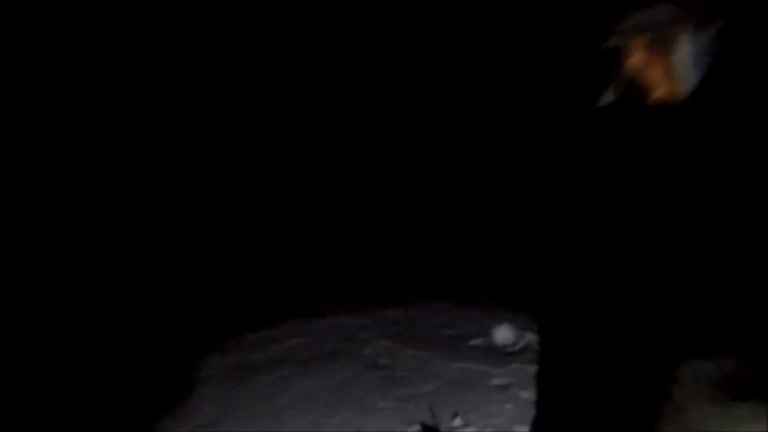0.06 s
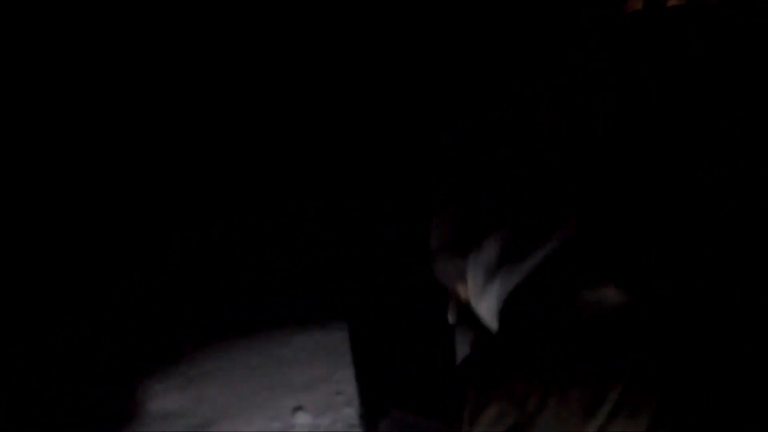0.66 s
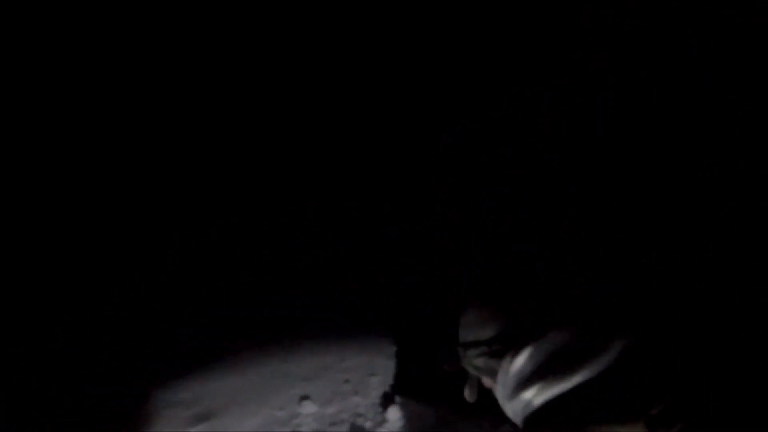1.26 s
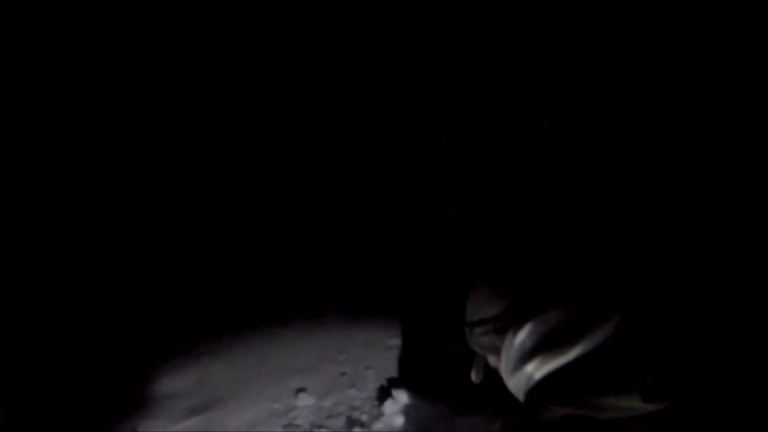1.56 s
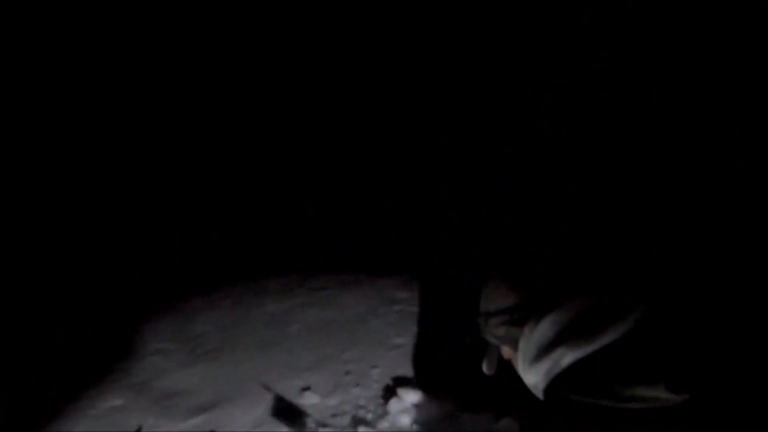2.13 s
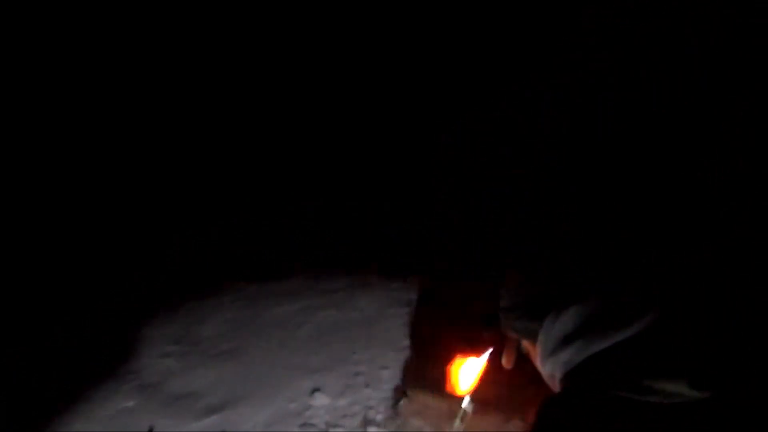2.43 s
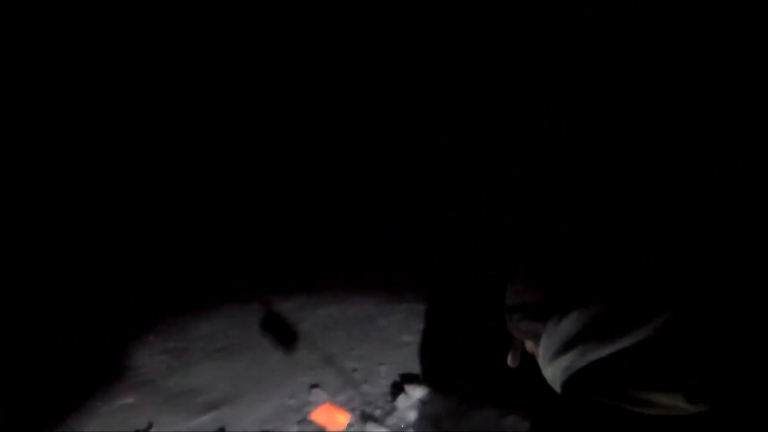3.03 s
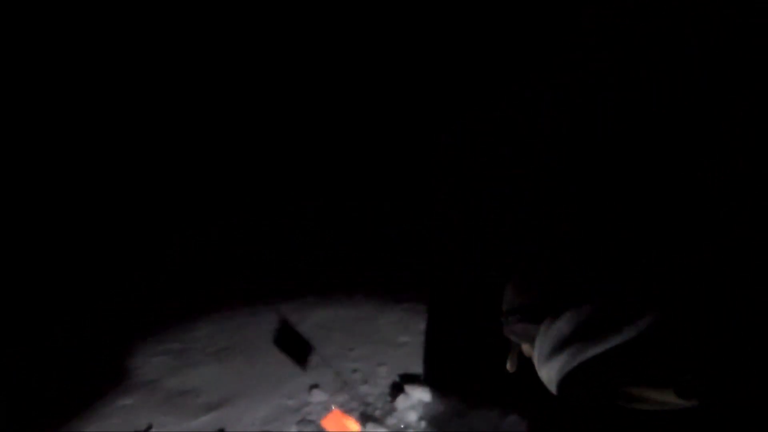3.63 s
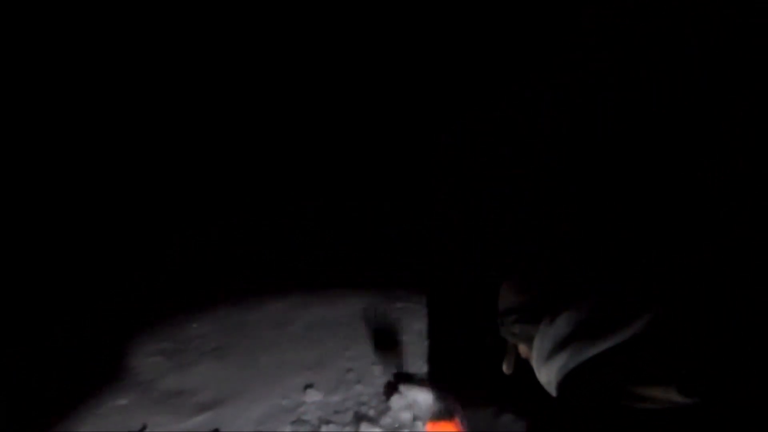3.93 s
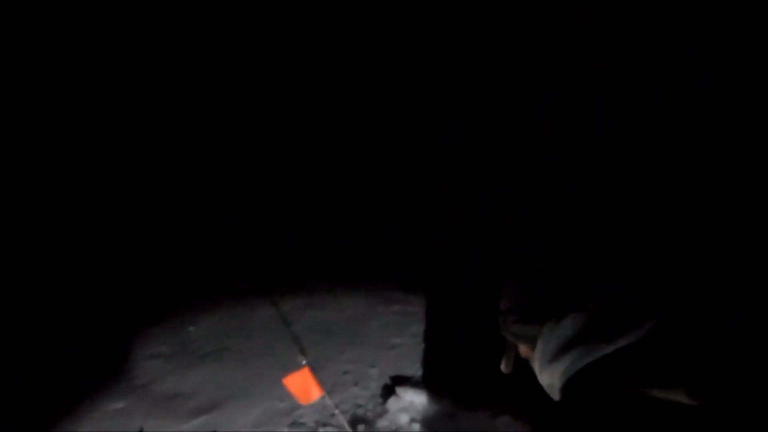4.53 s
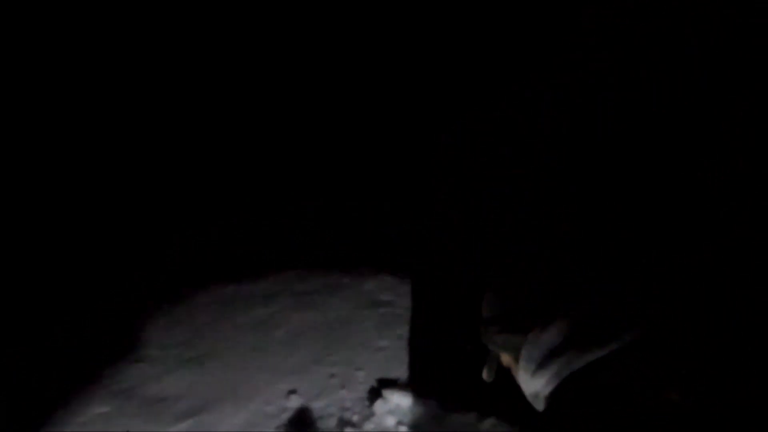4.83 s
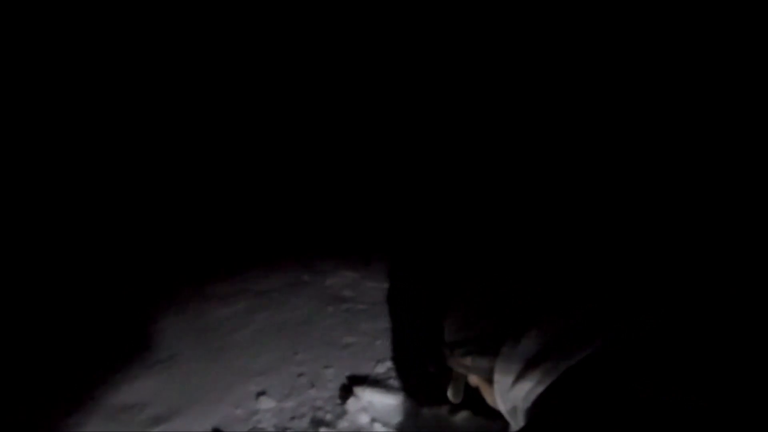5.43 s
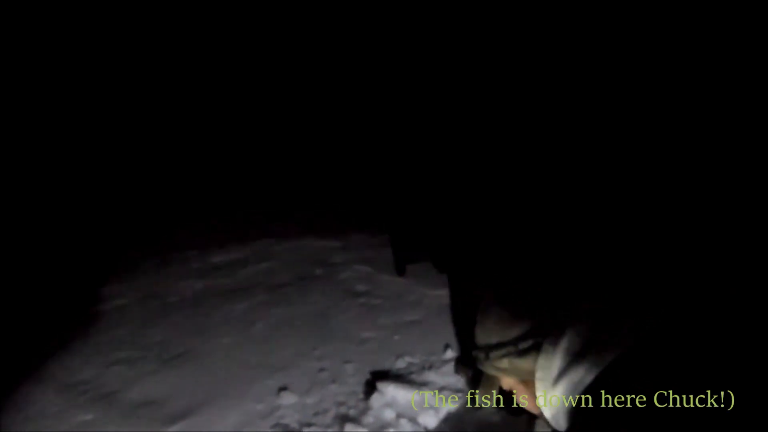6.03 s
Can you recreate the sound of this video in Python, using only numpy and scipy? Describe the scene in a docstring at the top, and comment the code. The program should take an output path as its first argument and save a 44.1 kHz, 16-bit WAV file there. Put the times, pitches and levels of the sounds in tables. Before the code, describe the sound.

Close up in quiet open air, someone shifts on packed snow, clothing rubbing and thin ice cracking. Hands then work in a slushy fishing hole: quick clusters of wet slaps, bubbly plops, clunks of ice and water running back. The trickle thins to drips, followed by a short hard click and some dull knocks on snow. A faint rumble and hiss lie underneath.

```python
"""Ice fishing on a still night.

Over a faint rumble and hiss, someone kneels in crusted snow; stiff winter clothes rustle.
Hands break the skin of ice on the hole, stir the slush and lift a rig out. Each slap traps a bubble
and throws water that runs back; after the lift the trickle thins to single drops."""
import sys
import numpy as np
from scipy import signal
from scipy.fft import rfft, irfft
from scipy.io import wavfile

SR = 44100
rng = np.random.default_rng(int(sys.argv[2]) if len(sys.argv) > 2 else 0)


def file_out(sig):
    """Save sig as 16-bit WAV at sys.argv[1]."""
    # one column per channel
    cols = np.atleast_2d(sig).T
    # limit, then scale
    lim = np.clip(cols, -1, 1)
    pcm = np.round(lim * 32767).astype(np.int16)
    wavfile.write(sys.argv[1], SR, pcm)


N = 277036
TIME_S = np.arange(N) / SR
BURST_FFT, LAYER_FFT = 8192, 294912
LIFT_S, DRAIN_DECAY_S, DRIP_END_S = 4.0, 0.31, 5.1
TRAP_DELAY_S = 0.002018  # from a slap to its bubble closing

# Spectra. Each row: frequency in Hz, relative level in dB.
AIR_SPECTRUM = [(25, -6.5), (50, -11.5), (140, -19.5), (320, -14), (550, -25), (2500, -32), (14000, -40.5)]
PRESSING_SPECTRUM = [(40, -19), (160, -8), (265, -2), (400, -3), (620, 2), (1500, -38.5)]
SLIDING_SPECTRUM = [(300, -23.5), (800, -3.5), (3000, -7), (7000, -11.5), (14000, -19)]
CRUST_SPECTRUM = [(40, -9), (150, -5.5), (580, 3), (1200, -6.5), (1900, -3.5), (9000, -21), (14000, -32.5)]
SLUSH_SPECTRUM = [(60, -30), (550, -8), (1200, -9.5), (1900, -4), (3400, -10), (4500, -10), (8000, -14.5),
                  (14000, -26)]
# Stereo widths. Each row: frequency in Hz, side minus mid in dB.
AIR_WIDTH = [(100, -5.5), (300, -8.5), (6000, 0.5)]
BODY_WIDTH = [(100, -11.5), (1400, -22.5), (5000, -7.5), (9000, -3)]
WATER_WIDTH = [(150, -7), (1400, -23), (3200, -17.5), (8000, -5)]
# Resonances of the rig and of the air in the hole. Each row: centre in Hz, width in Hz, boost in dB.
RIG_MODES = [(1420, 870, 15.3), (2720, 490, 26.5), (4110, 940, 21.5), (7000, 2800, 9.7)]
HOLE_MODES = [(580.4, 245, 10), (1007, 210, 7), (1620, 260, 4.5), (2000, 190, 5.5), (2555, 230, 5.5),
              (3500, 320, 9.5)]
# Background dips. Each row: start in seconds, gain in dB, recovery in seconds.
AIR_DIPS = [(2.47, -5.5, 0.35), (3.44, -7, 0.51)]
# Body moves. Each row: start and length in seconds, relative pressing and sliding levels in dB.
MOVES = [(-0.02, 0.26, -38.5, -42), (0.279, 0.075, -45, -51.5), (0.366, 0.17, -51, -56),
         (0.548, 0.17, -48.5, -52), (0.807, 0.29, -46, -55), (1.111, 0.19, -45.5, -49.5),
         (1.295, 0.038, -50, -53.5), (1.558, 0.092, -50.5, -59), (1.676, 0.02, -54, -49.5),
         (1.925, 0.031, -41, -44.5), (5.491, 0.032, -47.5, -54), (5.543, 0.12, -49, -55)]
# Crust caving in. Each row: start and length in seconds, relative level in dB, tilt in dB per octave,
# bass gain in dB.
CRUNCHES = [(0.228, 0.023, -45, 0.5, 15), (0.582, 0.054, -48.5, 1.6, 15), (1.513, 0.0082, -44.5, 4, -15),
            (1.534, 0.015, -53.5, 6, 16), (1.563, 0.066, -46.5, 6.5, 8), (1.636, 0.009, -43, 5, 29),
            (1.864, 0.0047, -38.5, 1, -4.5), (1.872, 0.01, -46, 2.5, 16), (6.229, 0.019, -41.5, -2, 7)]
# Thin ice snapping. Each row: start in seconds, relative level in dB, tilt in dB per octave.
ICE_SNAPS = [(0.415, -41.5, 2), (0.462, -51.5, -0.5), (0.494, -45, 1.5), (0.717, -50, 1.5),
             (0.738, -51, 2.5), (0.836, -53, -0.5), (0.853, -50.5, 1.5), (1.098, -52, 3.5), (1.165, -46, 2),
             (1.293, -45, -0.5), (1.346, -50, -1), (1.378, -54, 1.5), (2.674, -54.5, 1.5),
             (2.705, -49.5, 0.5), (4.285, -55.5, 1.5), (4.367, -52.5, 1.5), (5.003, -60.5, -1),
             (5.883, -49.5, -4.5)]
# Knocks on packed snow. Each row: start in seconds, relative level in dB.
SNOW_KNOCKS = [(0.745, -49.5), (1.96, -45.5), (5.22, -53), (5.668, -46), (6.163, -53.5)]
# Loose ice bumping. Each row: start in seconds, level in dB, pitch in Hz.
ICE_CLUNKS = [(1.657, -41.5, 715), (1.741, -37.5, 1080), (1.92, -36.5, 600), (2.0803, -38, 2020),
              (2.512, -33, 1990), (3.808, -40, 2050), (4.232, -42, 910)]
# A hand stirring the water. Each row: start and length in seconds, relative level in dB.
STIRS = [(2.027, 0.016, -50), (2.11, 0.065, -53.5), (2.66, 0.11, -51.5), (2.85, 0.25, -48.5),
         (3.199, 0.2, -49.5), (3.56, 0.012, -47.5), (3.731, 0.044, -45), (3.908, 0.1, -59.5),
         (4.117, 0.024, -46.5)]
# Further bubbles, each opening with a soft splat: drops falling into the hole, and extra bubbles right after
# some slaps. Each row: start in seconds, bubble peak in dB, bubble pitch in Hz.
BUBBLES = [(2.543, -39, 1484), (2.584, -50, 559), (2.759, -41.5, 6850), (2.915, -38, 1570), (2.989, -29, 830),
           (3.013, -41.5, 560), (3.157, -31.5, 2380), (3.317, -35, 4060), (3.385, -40.5, 852),
           (3.431, -24.5, 3190), (3.579, -41.5, 612), (3.965, -50, 851), (4.005, -29.5, 1806),
           (4.252, -51, 2100), (4.448, -44, 5670), (4.492, -48.5, 2240), (4.52, -50.5, 3200),
           (4.589, -54, 2650), (4.745, -63, 970), (5.187, -52, 1350)]
# Slaps in the slush. Each row: start in seconds, relative level in dB, tilt in dB per octave,
# bubble peak in dB, bubble pitch in Hz.
SLAPS = [(2.44, -43, 0.5, -51, 1570), (2.452, -37, -2.5, -38, 535), (2.464, -35, 2.5, -39, 2350),
         (2.47, -28.5, -6, -27.5, 967), (2.829, -38, -2, -41, 1820), (2.858, -38, 3.5, -35, 3500),
         (2.868, -32.5, 0, -32, 1560), (2.8985, -38, -4, -36, 893), (2.974, -34, -1.5, -39, 596),
         (3.061, -42, -0.5, -40, 1730), (3.091, -31.5, -2.5, -32.5, 285), (3.104, -36.5, -0.5, -33, 494),
         (3.123, -35.5, -2, -35.5, 3600), (3.148, -36, -3.5, -38, 559), (3.4304, -29, -2.5, -27, 562),
         (3.439, -31, -1.5, -29, 1950), (3.693, -38, -6, -44, 557), (3.725, -42.5, 0, -42, 608),
         (3.767, -36, -3.5, -41, 1000), (4.004, -32, -3.5, -29.5, 541)]


def from_db(db):
    return 10 ** (np.asarray(db) / 20)


def unit_rms(x):
    return x / np.sqrt(np.mean(x ** 2) + 1e-20)


def bins_hz(size):
    return np.maximum(np.fft.rfftfreq(size, 1 / SR), 1)


def curve_db(points, hz):
    """Interpolate on a log-frequency axis."""
    knots_hz, knots_db = np.array(points).T
    return np.interp(np.log(hz), np.log(knots_hz), knots_db)


def resonances_db(modes, size=BURST_FFT):
    """One bell-shaped boost per mode."""
    hz = bins_hz(size)
    return sum(db / (1 + (2 * (hz - centre_hz) / width_hz) ** 2) for centre_hz, width_hz, db in modes)


def slush_db(size=BURST_FFT):
    """Wet spectrum, lifted where the air in the hole resonates."""
    return curve_db(SLUSH_SPECTRUM, bins_hz(size)) + resonances_db(HOLE_MODES, size)


def add(out, start_s, sound):
    start = int(np.clip(start_s * SR, 0, N - 1))
    out[..., start:start + sound.shape[-1]] += sound[..., :N - start]


def drift(rate_hz):
    """Random wander between Gaussian knots."""
    knots = rng.standard_normal(2048)
    return np.interp(TIME_S * rate_hz % 2047, np.arange(len(knots)), knots)


def decay(start_s, decay_s):
    return (TIME_S > start_s) * np.exp(-np.clip((TIME_S - start_s) / decay_s, 0, 20))


def stroke(start_s, length_s, attack_s, swell_db, release_s):
    """Envelope of a movement: sets in, swells to 1, dies away."""
    t = TIME_S - start_s
    attack = np.clip(t / attack_s, 0, 1)
    swell = from_db(swell_db * (np.clip(t / length_s, 0, 1) - 1))
    return attack * swell * np.exp(-np.clip((t - length_s) / release_s, 0, 20))


def colour(mid_side, gains_db, width):
    """Minimum-phase filter: mid and side in, left and right out at rms 1."""
    size = 2 * (len(gains_db) - 1)
    cepstrum = irfft(np.log(from_db(gains_db)))
    cepstrum[1:size // 2] *= 2
    cepstrum[size // 2 + 1:] = 0
    mid, side = rfft(mid_side, size) * np.exp(rfft(cepstrum))
    side = side * from_db(curve_db(width, bins_hz(size)))
    return unit_rms(irfft([mid + side, mid - side])[:, :mid_side.shape[1]])


def colour_layer(mid_side, spectrum, width):
    return colour(mid_side, curve_db(spectrum, bins_hz(LAYER_FFT)), width)


def grains(samples, per_s, spread_db, hiss):
    """Tiny uneven breaks over smooth hiss, as mid and side."""
    sizes = from_db(spread_db * np.minimum(rng.exponential(1, samples), 4))
    breaks = sizes * (rng.random(samples) < per_s / SR) * rng.choice([-1, 1], (2, samples))
    return unit_rms(breaks) + hiss * rng.standard_normal((2, samples))


def bursts(rows, spectrum_db, width, snap, per_s, ripple_db, rise_s=0.001):
    """Each blow is a snap within a short shower of breaks. Rows as in CRUNCHES."""
    out = np.zeros((2, N))
    t, hz = np.arange(BURST_FFT) / SR, bins_hz(BURST_FFT)
    octaves = np.log2(np.maximum(hz, 200) / 1000)
    bass_shelf = 1 / (1 + (hz / 420) ** 4)
    for start_s, length_s, level_db, tilt_db, bass_db in rows:
        shower = (1 - np.exp(-t / rise_s)) * np.exp(-(t / length_s) ** 1.65)
        force = grains(BURST_FFT, per_s, spread_db=3, hiss=0.64) * shower
        force[:, int(rise_s * SR)] += snap * np.linalg.norm(force[0]) * rng.choice([-1, 1], 2)
        # each lump and air pocket has its own resonances
        ripple = np.interp(np.sqrt(hz) / 2.846, np.arange(BURST_FFT), rng.standard_normal(BURST_FFT))
        gains_db = spectrum_db + tilt_db * octaves + bass_db * bass_shelf + ripple_db * ripple
        gain = from_db(level_db) * np.sqrt(length_s * SR / BURST_FFT)
        add(out, start_s, gain * colour(force, gains_db, width))
    return out


def bubble(hz, t60_s, rise, swell_cycles=1.74):
    """Damped sine; the pitch climbs as the bubble nears the surface."""
    t = np.arange(int(t60_s * SR) + 2) / SR
    envelope = (1 - np.exp(-hz * t / swell_cycles)) * from_db(-60 * t / t60_s)
    return envelope / envelope.max() * np.sin(2 * np.pi * hz * t * (1 + rise * t / t60_s))


def swarm(count, low_hz, octaves, cycles, treble_db):
    """Bubbles of random time, pitch, level and place; rms 1."""
    out = np.zeros((2, N))
    for when, pitch, faintness, life, place in rng.random((count, 5)):
        hz = low_hz * 2 ** (octaves * pitch ** 1.2)
        pan_db = from_db(curve_db(WATER_WIDTH, hz)) * 20 * (place - 0.5)
        gains = from_db([[pan_db], [-pan_db]]) * from_db(treble_db * pitch - 20 * faintness)
        add(out, when * N / SR, gains * bubble(hz, cycles * (0.5 + life) / hz, rise=0.096))
    return unit_rms(out)


def background(rumble_hz=30.2):
    """Far rumble and faint hiss; the level dips briefly after the two hardest slaps."""
    air = from_db(-59.5) * colour_layer(rng.standard_normal((2, N)), AIR_SPECTRUM, AIR_WIDTH)
    rumble = from_db(-60.5) * np.sin(2 * np.pi * rumble_hz * TIME_S + 0.8 * drift(3))
    dip_db = sum(db * (TIME_S > start_s) * np.exp(-((TIME_S - start_s) / recovery_s) ** 4)
                 for start_s, db, recovery_s in AIR_DIPS)
    return from_db(dip_db) * (air + rumble)


def knee(peak_s=1.054, swell_s=0.077, hz=265):
    """Snow packs under a knee: a narrow low rub."""
    band = signal.butter(2, [hz / 1.2, hz * 1.2], "band", fs=SR, output="sos")
    rub = unit_rms(signal.sosfilt(band, rng.standard_normal(N)))
    return from_db(-51.5) * np.exp(-((TIME_S - peak_s) / swell_s) ** 2) * rub


def effort_db(settled_s=2, attack_s=0.013, swell_db=6, release_s=0.012):
    """Pressing and sliding grow as weight comes on; clothes stir faintly until the body settles."""
    pressing = sliding = from_db(-70.5) * stroke(0, settled_s, attack_s, 0, release_s) + 1e-9
    for start_s, length_s, pressing_db, sliding_db in MOVES:
        envelope = stroke(start_s, length_s, attack_s, swell_db, release_s)
        pressing = pressing + from_db(pressing_db) * envelope
        sliding = sliding + from_db(sliding_db) * envelope
    return 20 * np.log10([pressing, sliding])


def rustle():
    """Weight packs snow with a dull creak; sliding cloth hisses and snaps single crystals."""
    pressing_db, sliding_db = effort_db()
    catching_db = 1.8 * drift(90)
    creak = colour_layer(grains(N, per_s=700, spread_db=2.5, hiss=0.53), PRESSING_SPECTRUM, BODY_WIDTH)
    grit = grains(N, per_s=2000, spread_db=0.5, hiss=0.94)
    crystals = grains(N, per_s=45, spread_db=3.5, hiss=0)
    rub = colour_layer(grit + from_db(-6.5) * crystals, SLIDING_SPECTRUM, BODY_WIDTH)
    # slow rubbing is duller
    dull_rub = signal.sosfilt(signal.butter(1, 4500, fs=SR, output="sos"), rub)
    speed = 1 / (1 + from_db(-2 * (sliding_db + 53)))
    sliding = dull_rub + 0.75 * speed * (rub - dull_rub)
    # gentle pressing keeps only the lows
    low_creak = signal.sosfilt(signal.butter(2, 420, fs=SR, output="sos"), creak)
    weight = 1 / (1 + from_db(-2 * (pressing_db + 42)))
    pressing = np.sqrt(1 - weight) * low_creak + np.sqrt(weight) * creak
    return from_db(catching_db) * (from_db(pressing_db - 5) * pressing + from_db(sliding_db) * sliding)


def crust(snap_s=0.0033, knock_s=0.0059):
    """Snow crust caves in, thin ice snaps, packed snow knocks dully."""
    snaps = [(start_s, snap_s, db, tilt_db, -20.5 + 12.4 * tilt_db) for start_s, db, tilt_db in ICE_SNAPS]
    knocks = [(start_s, knock_s, db, -5.5, -1) for start_s, db in SNOW_KNOCKS]
    rows = CRUNCHES + snaps + knocks
    spectrum_db = curve_db(CRUST_SPECTRUM, bins_hz(BURST_FFT))
    return from_db(3.5) * bursts(rows, spectrum_db, BODY_WIDTH, snap=0.26, per_s=2800, ripple_db=2)


def rig_click(start_s=4.852, contact_s=0.0086, level_db=-41.5):
    """A hard part of the rig catches and rings briefly."""
    row = (start_s, contact_s, level_db, 0, 0)
    return bursts([row], resonances_db(RIG_MODES), WATER_WIDTH, snap=0.1, per_s=2600, ripple_db=-1.5)


def ice_clunks(contact_s=0.0034, tilt_db=-2.5, bass_db=-5, q=2, ring_db=10.5):
    """Loose ice bumps in the hole; each lump rings hollow at its own pitch."""
    out = np.zeros((2, N))
    for start_s, db, hz in ICE_CLUNKS:
        row = (start_s, contact_s, db, tilt_db, bass_db)
        spectrum_db = slush_db() + resonances_db([(hz, hz / q, ring_db)])
        out += bursts([row], spectrum_db, WATER_WIDTH, snap=0.35, per_s=2500, ripple_db=1.5)
    return out


def water_flow():
    """Envelope of water stirred by hand, running back after slaps and draining off the rig."""
    stirred = [from_db(db) * stroke(start_s, length_s, attack_s=0.0074, swell_db=2.5, release_s=0.034)
               for start_s, length_s, db in STIRS]
    runoff = [from_db(db - 16.5) * decay(start_s, decay_s=0.065) for start_s, db, *_ in SLAPS]
    drain = [from_db(-50.5) * decay(LIFT_S, DRAIN_DECAY_S)]
    return np.sqrt(sum(part ** 2 for part in stirred + runoff + drain))


def trickle():
    """Water gurgles, sprays and patters in spurts; draining sounds the air in the hole.
    Faint stray drips tick throughout the stirring and draining."""
    flow = water_flow() * from_db(-3 + 4.8 * drift(90))
    gurgle = from_db(-2) * swarm(2400, low_hz=481.3, octaves=2.6, cycles=22, treble_db=4)
    spray = from_db(-11) * swarm(2400, low_hz=2000, octaves=2.5, cycles=16, treble_db=2.5)
    hollow = from_db(-57) * swarm(900, low_hz=900, octaves=0.17, cycles=41, treble_db=2)
    wet_grains = grains(N, per_s=900, spread_db=2.8, hiss=0.5)
    patter = from_db(-5) * colour(wet_grains, slush_db(LAYER_FFT), WATER_WIDTH)
    drips = from_db(-76) * swarm(520, low_hz=1280, octaves=2.03, cycles=8.6, treble_db=3.5)
    dripping = (TIME_S > STIRS[0][0]) & (TIME_S < DRIP_END_S)
    return flow * (gurgle + spray + patter) + decay(LIFT_S, DRAIN_DECAY_S) * hollow + dripping * drips


def hole_ring(lowest_t60_s=0.06, slosh_octaves=0.08):
    """Each slap rings the air in the hole; sloshing detunes it."""
    out = np.zeros(N)
    for start_s, db, *_ in SLAPS:
        for mode_hz, _, boost_db in HOLE_MODES:
            t60_s = lowest_t60_s * np.sqrt(HOLE_MODES[0][0] / mode_hz)
            for hz in mode_hz * 2 ** (slosh_octaves * rng.standard_normal(2)):
                add(out, start_s + TRAP_DELAY_S, from_db(db + boost_db - 28) * bubble(hz, t60_s, rise=0))
    return out


def plops(ref_t60_s=0.038, ref_hz=1000, ref_db=-39.5):
    """Bubbles trapped by slaps and drops; low ones and quiet, deeper ones ring longest."""
    out = np.zeros(N)
    trapped = [(start_s + TRAP_DELAY_S, db, hz) for start_s, _, _, db, hz in SLAPS]
    for start_s, peak_db, hz in trapped + BUBBLES:
        t60_s = ref_t60_s * np.sqrt(ref_hz / hz) * from_db(0.21 * (ref_db - peak_db))
        add(out, start_s, from_db(peak_db) * bubble(hz, t60_s, rise=0.1))
    return out


def slush(impact_s=0.0064):
    """Hands slap the slush; each further bubble opens with a soft splat, small ones brighter."""
    slaps = [(start_s, impact_s, db, tilt_db, 7.5 + 3.56 * tilt_db) for start_s, db, tilt_db, *_ in SLAPS]
    splats = [(start_s, impact_s, db - 13, np.log2(hz / 1000), -7) for start_s, db, hz in BUBBLES]
    impacts = bursts(slaps + splats, slush_db(), WATER_WIDTH, snap=0.42, per_s=2500, ripple_db=3.5)
    return from_db(-0.5) * impacts


def scene():
    """Open air, close and dry; the body slightly left."""
    body = (crust() + rustle() + knee()) * from_db([[0.45], [-0.45]])
    return body + slush() + hole_ring() + ice_clunks() + rig_click() + plops() + trickle() + background()


def record(dry):
    """Steep low-pass at 14.3 kHz."""
    return signal.sosfilt(signal.ellip(10, 0.1, 70, 14300, fs=SR, output="sos"), dry)


dry = scene()
out = record(dry)
file_out(out)
```